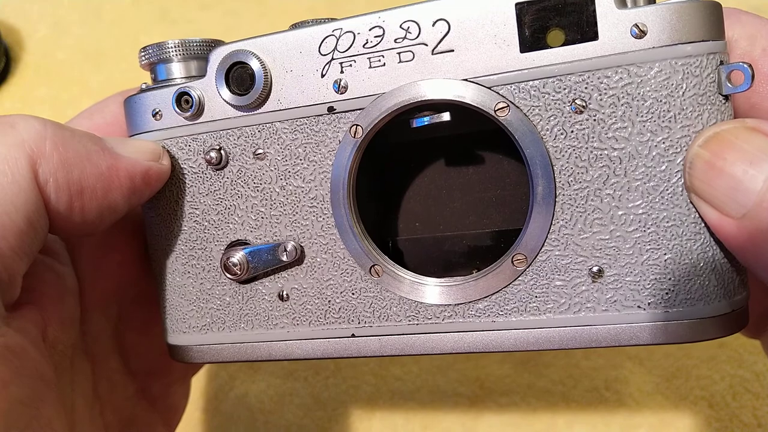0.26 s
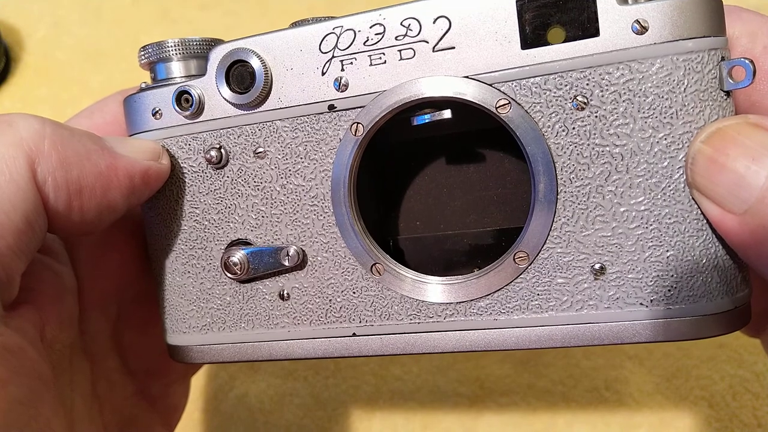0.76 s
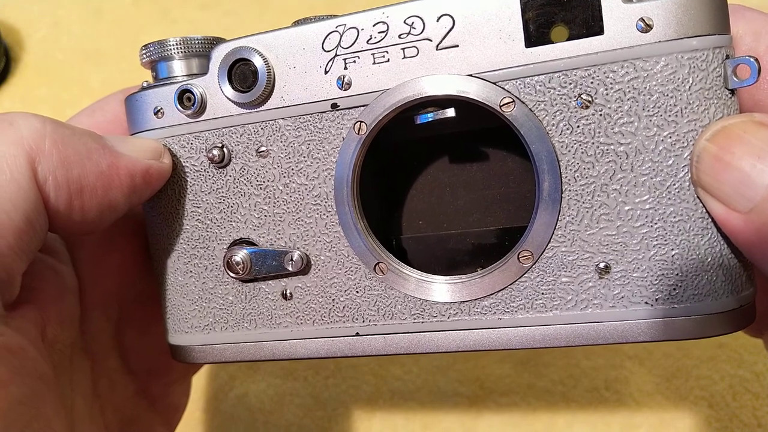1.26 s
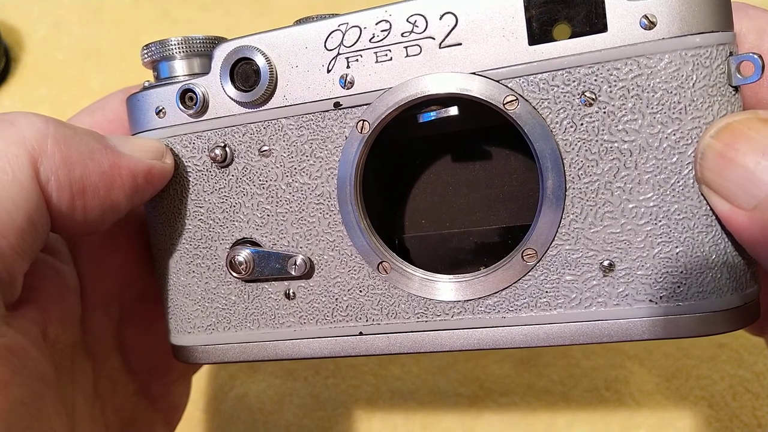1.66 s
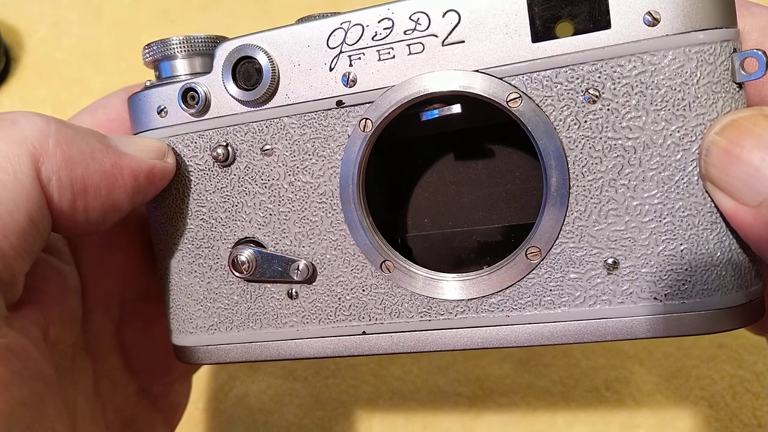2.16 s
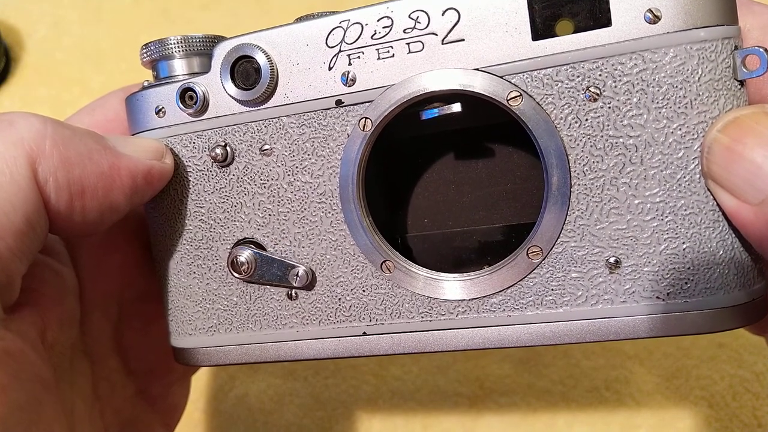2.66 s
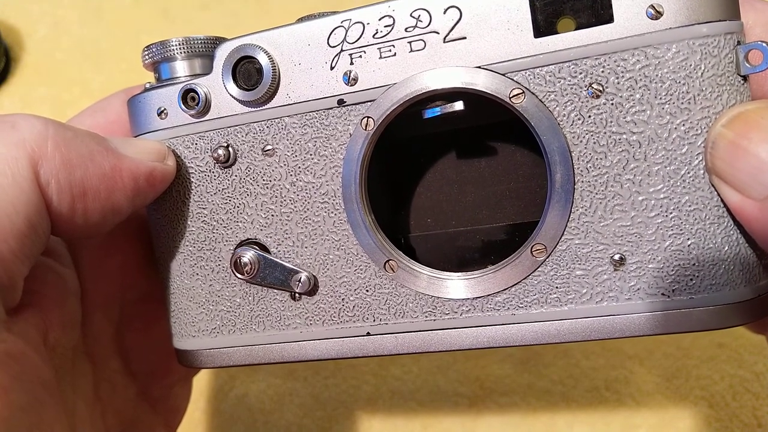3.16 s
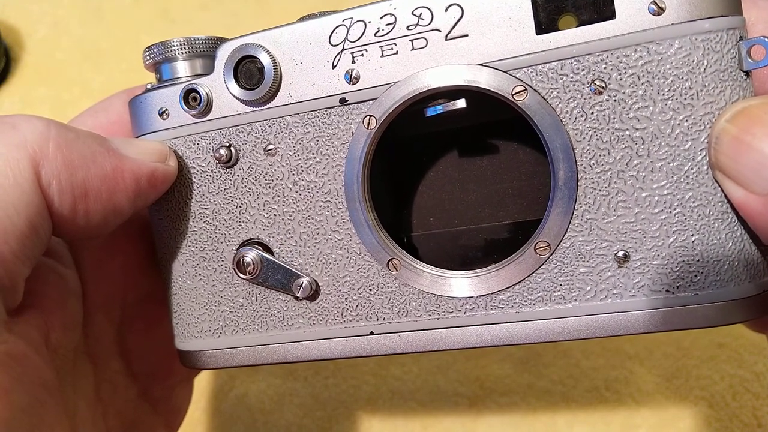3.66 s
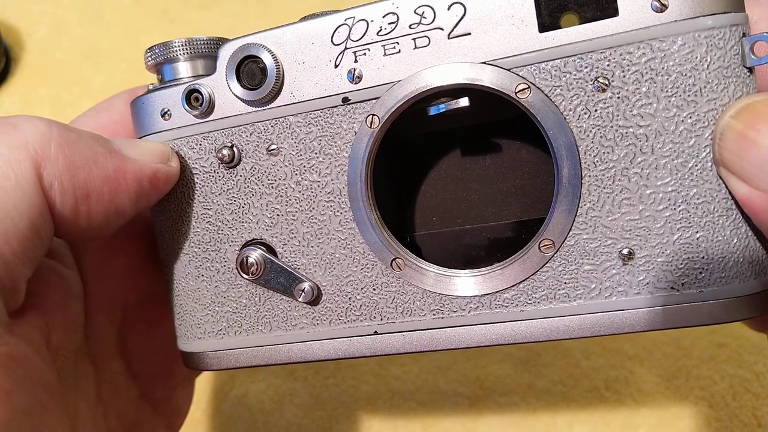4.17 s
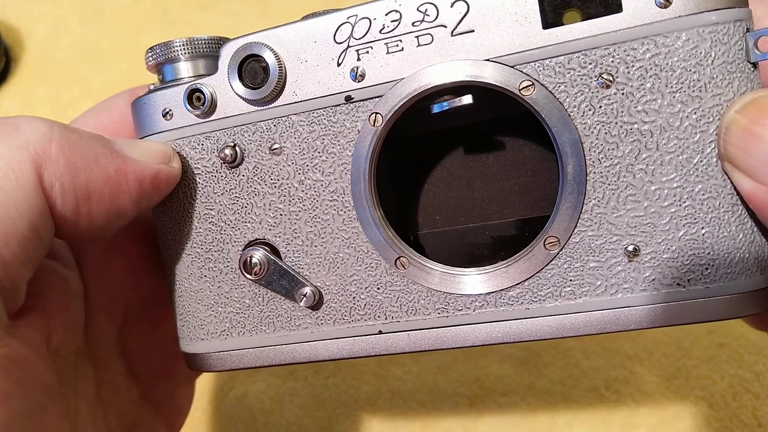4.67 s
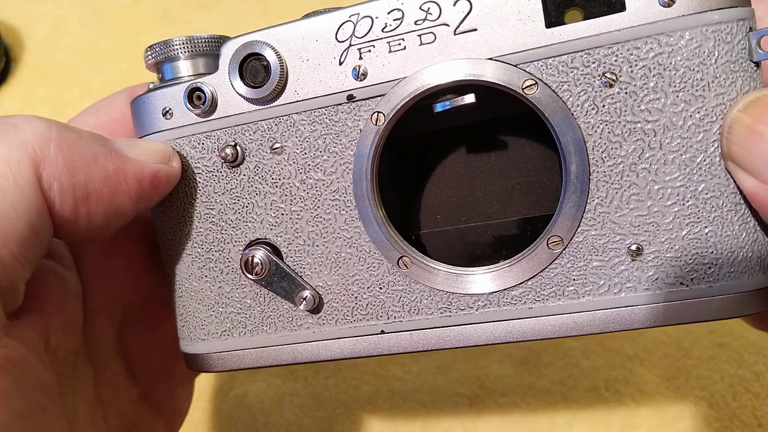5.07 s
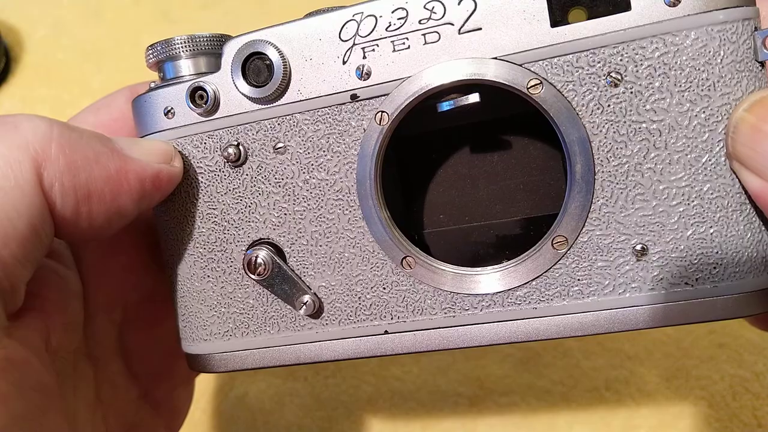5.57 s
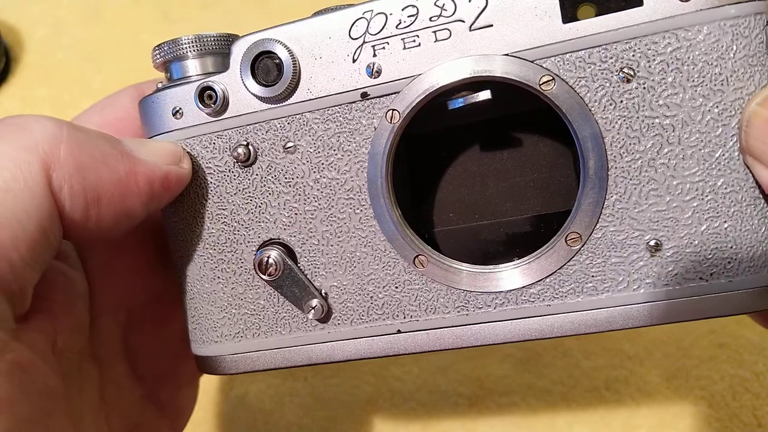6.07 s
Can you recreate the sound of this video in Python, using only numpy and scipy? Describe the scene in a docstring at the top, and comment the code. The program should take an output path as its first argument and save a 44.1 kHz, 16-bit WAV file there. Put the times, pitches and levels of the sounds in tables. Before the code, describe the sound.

Continuous raspy whir of small gears and a rocking anchor inside a thin metal case, heard very close. Roughly two hundred beats a second make a low buzzing pitch with a hard, tinny midrange and upper colour. It flutters, surges and gradually loses speed, brightness and strength, with occasional sharper snaps. Finger rubs and low room rumble are almost hidden beneath it; the buzz is still running at the end.

```python
"""Clockwork self-timer running down

The self-timer of an old metal camera, held in two hands in a quiet room, buzzes at about 210 beats a second.
A rocking anchor strikes and rebounds on the escape wheel; each beat excites the resonances of the camera body.
The spring weakens and the speed wavers; the buzz is louder when faster, with a few harder snaps.
Around it lie a short diffuse tail, soft rubs of fingers made of shaped noise, and a faint rumble and hum."""
import sys
import numpy as np
from scipy import signal
from scipy.fft import rfft, irfft
from scipy.io import wavfile
from scipy.ndimage import uniform_filter1d

SR = 44100
rng = np.random.default_rng(int(sys.argv[2]) if len(sys.argv) > 2 else 0)


def wav_out(sig):
    """Save sig, one row per channel (or a flat mono array), as 16-bit PCM at SR to the path in sys.argv[1]."""
    wavfile.write(sys.argv[1], SR, np.round(np.clip(np.atleast_2d(sig).T, -1, 1) * 32767).astype(np.int16))


N = 279153
T = np.arange(N) / SR  # time [s]
FREQS = np.arange(4097) * SR / 8192  # frequency grid of the body response [Hz]
BEAT_HZ = 216.45  # nominal beat rate of the mainspring


def undb(db):
    """Decibels to gain."""
    return 10 ** (np.asarray(db) / 20)


def unit(x):
    """Scale to rms 1."""
    return x / np.sqrt(np.mean(x ** 2))


def convolve(x, response):
    """Pass a sound through an impulse response."""
    return signal.oaconvolve(x, response)[:N]


def noise(gain_at):
    """Noise of rms 1 whose spectrum is a function of frequency."""
    hz = np.arange(N + 1) * SR / (2 * N) + 1  # 1 Hz up, so that a log of it is safe
    spectrum = rfft(rng.standard_normal(2 * N))
    return unit(irfft(spectrum * gain_at(hz))[:N])


def impulses(times, sizes):
    """One sharp push at each time."""
    samples = np.clip(times * SR, 0, N).astype(int)
    return np.bincount(samples, sizes, N + 1)[:N]


def walk(rate):
    """Random levels of rms 1, each held 1 / rate s, then smoothed twice over that time."""
    hold = int(SR / rate)
    steps = np.repeat(rng.standard_normal(N // hold + 1), hold)
    smooth = uniform_filter1d(uniform_filter1d(steps, hold), hold)
    return unit(smooth[:N])


def room(rumble_db=-80):
    """Low rumble from shaped noise, and a steady hum of pure tones."""
    # spectrum of the rumble: (frequency [Hz], relative density [dB per Hz])
    rumble_curve = [(20, -22.5), (35, -21), (56, 1), (68, -3.5), (85, -8.5), (122, 3), (170, -10),
                    (210, -10), (300, -16), (550, -17.5), (2000, -28.5), (8000, -35)]
    # tones of the hum: (frequency [Hz], rms level [dB])
    hum_lines = [(98, -76), (392, -103), (490, -102)]
    curve_hz, curve_db = np.transpose(rumble_curve)
    rumble = noise(lambda f: undb(np.interp(np.log(f), np.log(curve_hz), curve_db)))
    hum = 0
    for hz, db in hum_lines:
        tone = np.sin(2 * np.pi * (hz * T + rng.random()))
        hum = hum + undb(db) * np.sqrt(2) * tone
    return undb(rumble_db) * rumble + hum


def fingers():
    """Soft, dull rubs of skin on the case: swelling, fading bands of noise; a sliding finger rises in pitch."""
    # rubs: (time [s], peak level [dB], centre [Hz], band width [Hz], decay [s], glide [Hz per s])
    rubs = [(0.355, -76, 670, 120, .008, 0), (0.95, -69, 390, 120, .005, 0), (0.948, -70, 225, 70, .008, 0),
            (1.455, -74, 260, 220, .01, 0), (2.25, -63, 720, 100, .065, 350),
            (2.24, -68, 280, 240, .033, 0), (3.315, -74, 205, 80, .012, 0), (5.31, -76, 590, 90, .012, 0)]
    out, t = np.zeros(N + SR), T[:SR // 2]
    hz = np.arange(len(t) // 2 + 1) * SR / len(t)
    for start, peak_db, centre, width, decay, glide in rubs:
        band = np.exp(-2 * ((hz - centre) / width) ** 2)
        skin = signal.hilbert(irfft(rfft(rng.standard_normal(len(t))) * band))
        sliding = np.real(skin * np.exp(1j * np.pi * glide * t ** 2))
        rub = sliding * t * np.exp(-t / decay)
        first = int(start * SR)
        out[first:first + len(rub)] += undb(peak_db) * rub / np.abs(rub).max()
    return out[:N]


def reflections(x, t60=0.13, wet_db=-12, gap_s=0.0015, count=8):
    """The table and nearby walls return a short diffuse tail that changes as the hands drift."""
    t, out = T[:SR // 3], 0
    for place in np.eye(count):
        tail = rng.standard_normal(len(t)) * undb(-60 * t / t60) * (t > gap_s)
        # equal-power crossfade from one place to the next
        share = np.sqrt(np.interp(T, np.linspace(0, T[-1], count), place))
        out = out + convolve(x * share, tail / np.linalg.norm(tail))
    return undb(wet_db) * out


def body_response(wound, edge_hz=830):
    """Causal ring of the case, built from its resonances; it is too small to radiate below the edge."""
    # camera body: (centre [Hz], half width [Hz], level when wound [dB], level when run down [dB])
    resonances = [(939, 47, -15, -15), (1088, 77, -6, -8), (1492, 70, -13, -15), (1703, 68, -11, -15),
                  (1827, 83, -6, -6), (2355, 111, 0, -5), (2468, 75, -4, -5), (2789, 65, -4, -6),
                  (3140, 251, -2, -1), (3369, 65, 0, -12), (3603, 80, -3, -7), (3777, 52, -9, -8),
                  (4173, 182, -3, -3), (4660, 284, -2, -4), (4808, 99, 0, -4), (5125, 160, -11, -13),
                  (5332, 61, -5, -5), (5834, 288, -4, -6), (6289, 70, -14, -8), (6538, 216, -4, -2),
                  (6871, 119, -4, -14), (7087, 115, 0, -3), (7427, 115, -5, -3), (7817, 211, -18, -22)]
    power = 0
    for hz, width, full_db, spent_db in resonances:
        peak = undb(full_db if wound else spent_db) ** 2
        power = power + peak / (1 + ((FREQS - hz) / width) ** 2) ** 2
    power = power / (1 + (edge_hz / (FREQS + 1)) ** 26)
    # fold the cepstrum forward: minimum phase, so the ring starts at once
    cepstrum = irfft(np.log(power + 1e-7) / 2)
    half = len(cepstrum) // 2
    folded = np.r_[cepstrum[0], 2 * cepstrum[1:half]]
    return irfft(np.exp(rfft(folded, 2 * half)))


def body(force):
    """The case rings; its balance of resonances shifts as the lever comes round."""
    wound, spent = body_response(True), body_response(False)
    wound, spent = wound / np.linalg.norm(wound), spent / np.linalg.norm(spent)
    travel = T / T[-1]
    return (1 - travel) * convolve(force, wound) + travel * convolve(force, spent)


def snaps():
    """Gear teeth catch and snap free: single harder knocks, scaled by the peak of the wound body's ring."""
    # knocks: (time [s], level [dB])
    knocks = [(0.0804, -19), (0.1411, -20), (0.3499, -21), (0.3571, -21), (0.6001, -20), (0.7507, -21),
              (1.6397, -24), (1.9985, -19), (3.2906, -22), (3.8145, -22), (4.8887, -24), (6.174, -23)]
    times, peak_db = np.transpose(knocks)
    response = body_response(True)
    return impulses(times, undb(peak_db)) * np.linalg.norm(response) / np.abs(response).max()


def train_speed():
    """Beats per second: the spring weakens, gear teeth bind, the speed surges slowly and friction wanders."""
    # slow surges of the speed: (period [beats], swing [Hz], fastest at [beats])
    surges = [(155.6, 4.9, 48), (172.5, 3.3, 72), (434, 2.9, 266)]
    # brief stumbles of the train: (time [s], speed lost [Hz])
    stumbles = [(.6, 11), (.88, 14), (1.02, 14), (3.93, 12), (4.89, 14), (5.59, 10)]
    sag_hz_per_s = 3.08
    extra_hz, extra_s = 18.6, .42  # extra speed of the fully wound spring, and its fade time
    tooth_beats, first_bind_beats = 47.04, 43.3  # spacing of the driving gear's teeth, and first bind
    bind_beats, bind_hz = 4.9, 18.5  # spread of a bind, and depth of its dip in speed
    stumble_s = .017  # spread of a stumble
    wander_hz, wander_per_s = 2.2, 25

    spring = BEAT_HZ - sag_hz_per_s * T + extra_hz * np.exp(-T / extra_s)
    beats = np.cumsum(spring) / SR
    # distance to the nearest bind, in beats
    from_bind = (beats - first_bind_beats + tooth_beats / 2) % tooth_beats - tooth_beats / 2
    bind = bind_hz * np.exp(-(from_bind / bind_beats) ** 2 / 2)
    surge = sum(hz * np.cos(2 * np.pi * (beats - fastest) / period) for period, hz, fastest in surges)
    stumble = sum(hz * np.exp(-((T - at) / stumble_s) ** 2 / 2) for at, hz in stumbles)
    wander = wander_hz * walk(wander_per_s)
    # binding makes the speed waver but leaves its mean alone
    return spring - (bind - bind.mean()) + surge - stumble + wander


def chatter(count, colour_db=5.5, rebound_s=0.0004415, loss_db=-2.0, rub_db=-1.0, rub_s=0.0033, size=512):
    """One row per beat: a strike, four rebounds that tend to weaken, and the pallet rubbing off the tooth."""
    # ranges of the case that a contact excites unevenly: (centre [Hz], first strike [dB], rebounds [dB])
    ranges = [(1200, -2.5, -1), (2410, -1.5, -1), (3450, 2, -2), (4840, 0.5, -1), (6060, -6, 0.5),
              (6900, -5.5, 0.5)]
    hz = np.arange(size // 2 + 1) * SR / size
    centres, strike_db, bounce_db = np.transpose(ranges)
    zones = np.array([np.interp(hz, centres, own) for own in np.eye(len(centres))])
    lead = 32 / SR  # short silence ahead of the strike [s]
    delay, spectrum = np.full((count, 1), lead), 0
    for bounce in range(5):
        db = bounce_db + loss_db * (bounce - 1) if bounce else strike_db
        # no two contacts are alike, so each has its own colour
        db = db + colour_db * rng.uniform(-1, 1, (count, len(centres)))
        sign = rng.choice([-1, 1], (count, 1))
        spectrum = spectrum + sign * undb(db @ zones) * np.exp(-2j * np.pi * hz * delay)
        delay = delay + rebound_s * rng.uniform(.5, 1.5, (count, 1))
    sliding = np.exp(-T[:size] / rub_s) * (T[:size] > lead)
    rub = rng.standard_normal((count, size)) * sliding / np.linalg.norm(sliding)
    spectrum = spectrum + undb(rub_db) * rfft(rub)
    # how the anchor rattles sets the colour of a beat, not its energy through the body
    body_gain = np.abs(rfft(body_response(True))) + np.abs(rfft(body_response(False)))
    heard = np.interp(hz, FREQS, body_gain)
    return irfft(spectrum / np.linalg.norm(spectrum * heard, axis=1, keepdims=True))


def escapement(beat_hz, limp_db=2.5, limp_s=.00014, jitter_s=.00017):
    """Two unequal pallets strike the escape wheel in turn, with a force that flutters regularly."""
    # regular flutter of the force: (period [beats], swing [dB], hardest at [beats])
    flutters = [(11.06, .35, 3.2), (16, .35, 3.8), (23.5, .25, 7.5)]
    phase = np.cumsum(beat_hz) / SR
    beats = np.arange(int(phase[-1]) + 1)
    pallet = 1 - 2 * (beats % 2)  # +1 and -1 in turn
    jitter = jitter_s * rng.standard_normal(len(beats))
    times = np.interp(beats, phase, T) + limp_s * pallet + jitter
    flutter_db = sum(db * np.cos(2 * np.pi * (beats - hardest) / period) for period, db, hardest in flutters)
    # beats differ in force, but the spring evens them out over the neighbouring teeth
    uneven_db = 1.25 * rng.standard_normal(len(beats))
    uneven_db = uneven_db - uniform_filter1d(uneven_db, size=35)
    force_db = limp_db * pallet / 2 + flutter_db + uneven_db
    rows = chatter(len(beats)) * undb(force_db)[:, None]
    starts = np.clip(times * SR, 0, N).astype(int)
    places = starts[:, None] + np.arange(rows.shape[1])
    return unit(np.bincount(places.ravel(), rows.ravel(), N)[:N])


def scene(drive_db=-34, drive_db_per_hz=.068):
    """The timer buzzes close by, louder whenever it runs faster, over its tail, the fingers and the room."""
    beat_hz = train_speed()
    # drive_db is the level of the strikes at the nominal beat rate
    level_db = drive_db + drive_db_per_hz * (beat_hz - BEAT_HZ)
    timer = body(escapement(beat_hz) * undb(level_db) + snaps())
    return (timer + reflections(timer) + fingers() + room())[None]


def record(dry, top_hz=8250):
    """A steep elliptic low-pass cuts the top."""
    low_pass = signal.ellip(12, .2, 70, top_hz, fs=SR, output="sos")  # ripple .2 dB, stop band -70 dB
    return signal.sosfilt(low_pass, dry)


dry = scene()
out = record(dry)
wav_out(out)
```